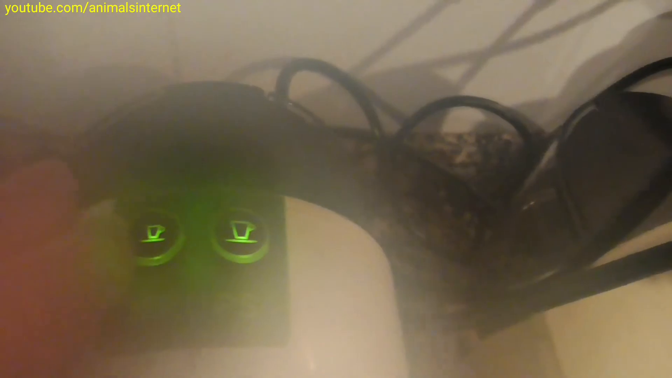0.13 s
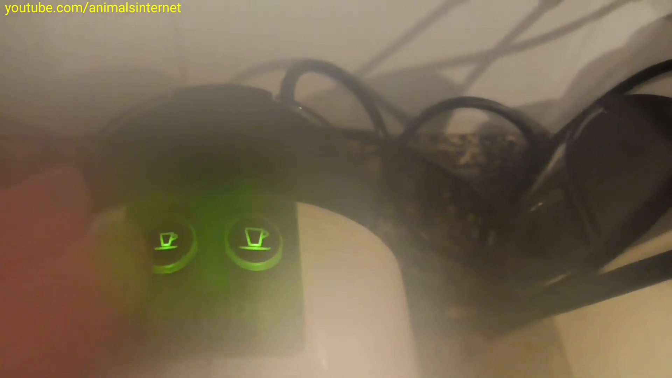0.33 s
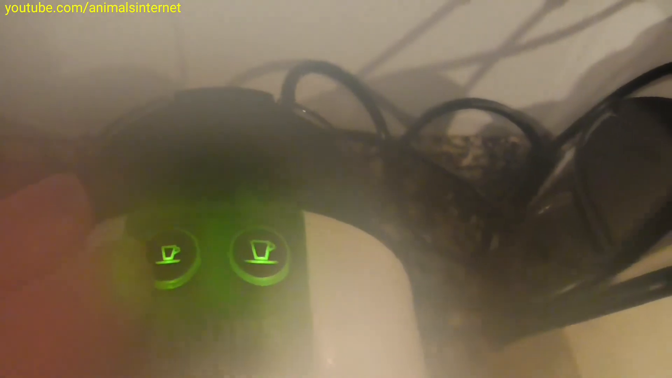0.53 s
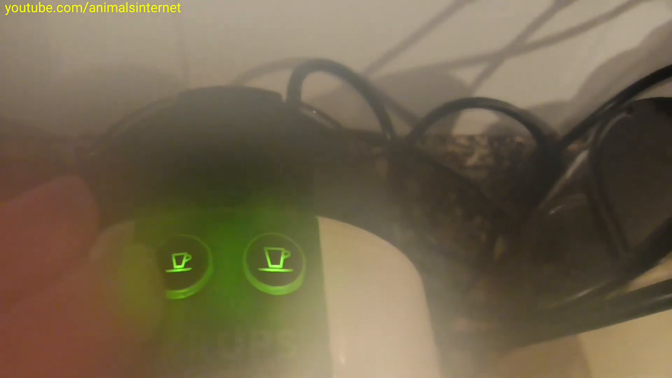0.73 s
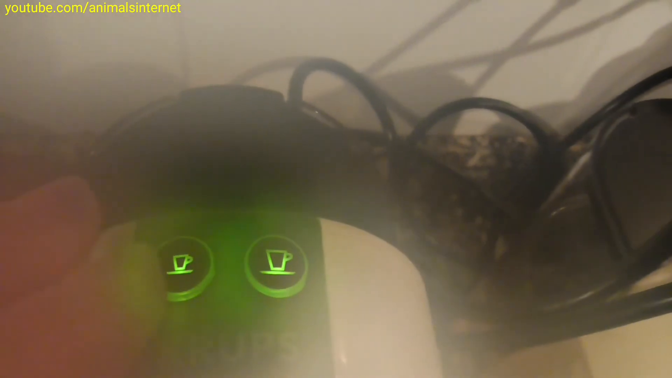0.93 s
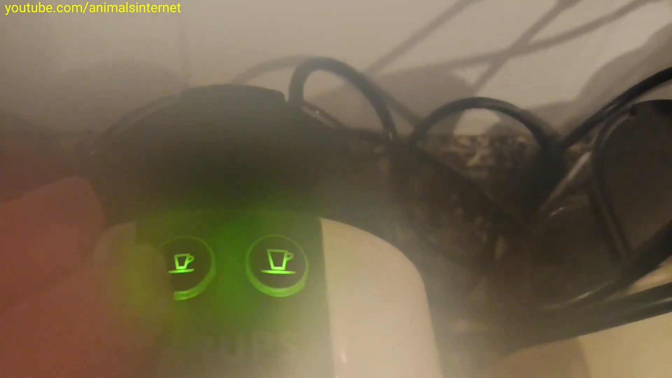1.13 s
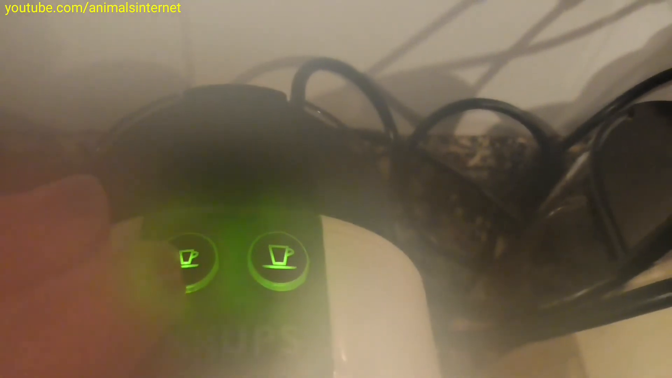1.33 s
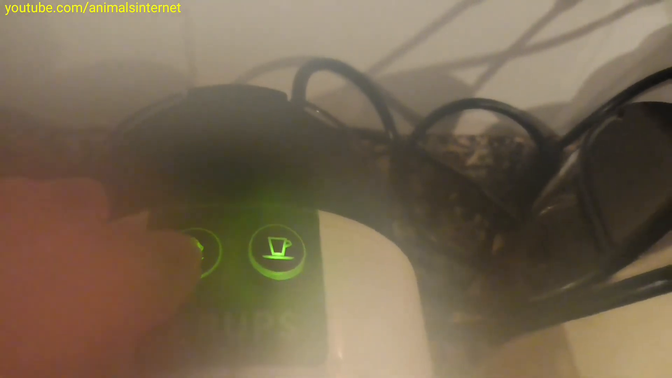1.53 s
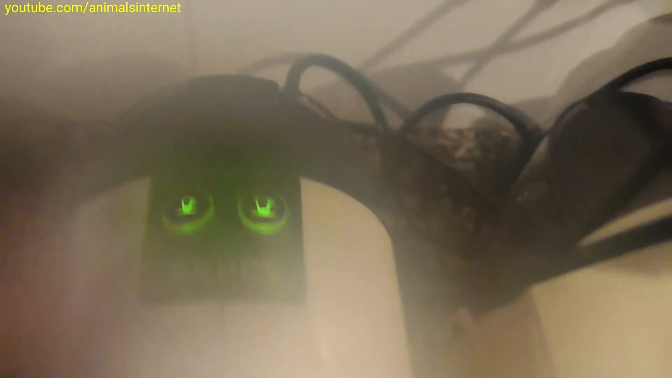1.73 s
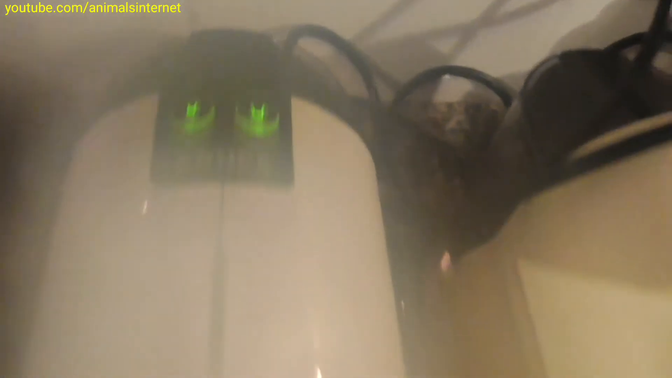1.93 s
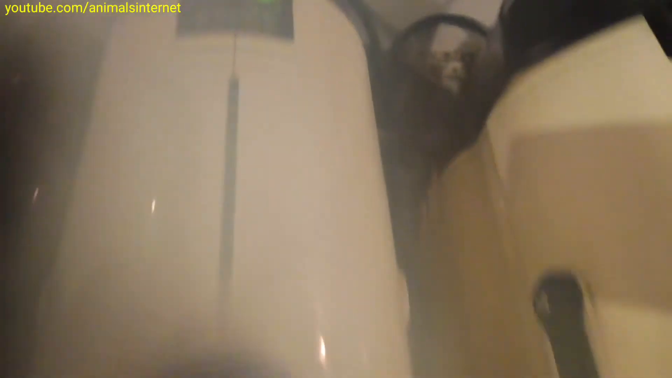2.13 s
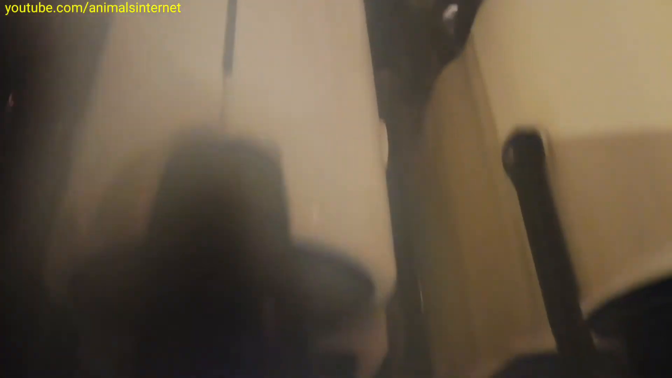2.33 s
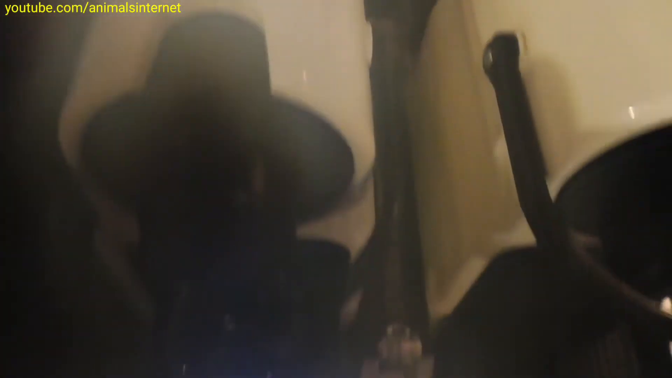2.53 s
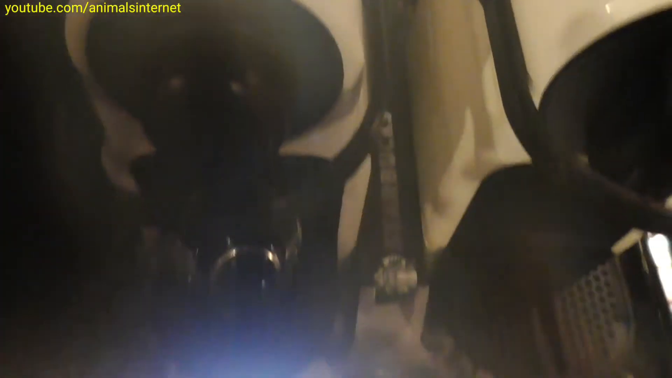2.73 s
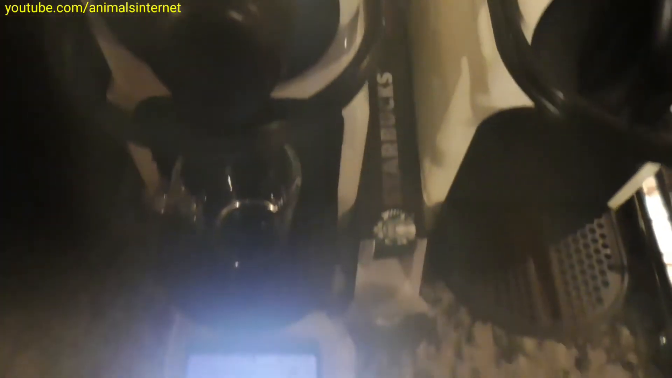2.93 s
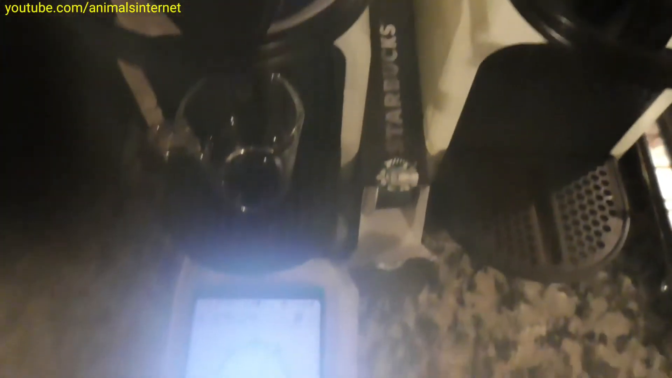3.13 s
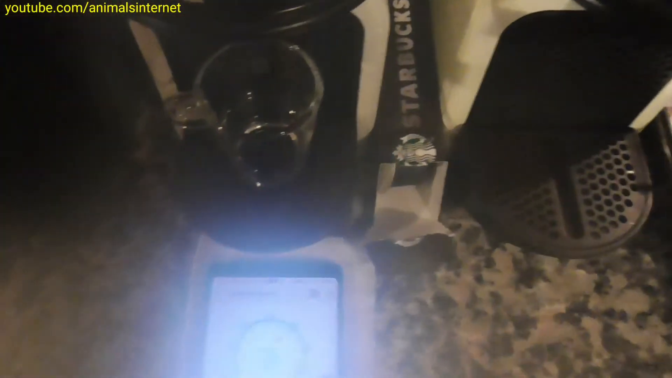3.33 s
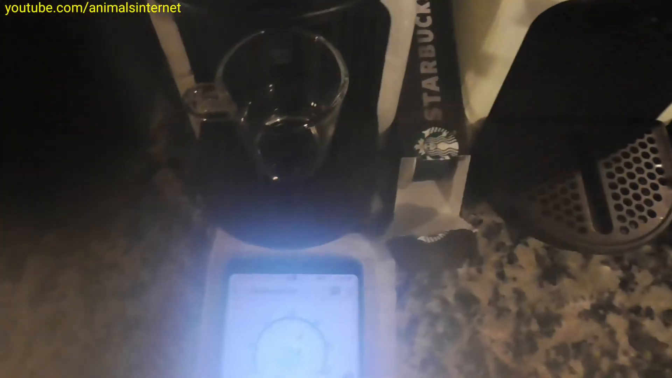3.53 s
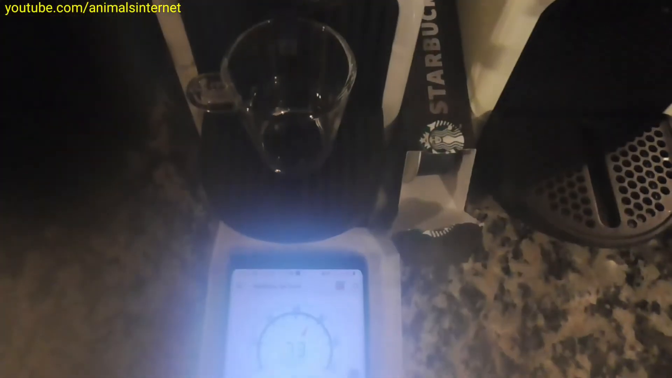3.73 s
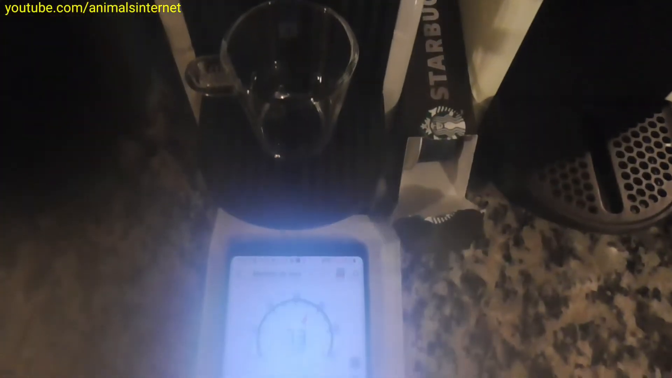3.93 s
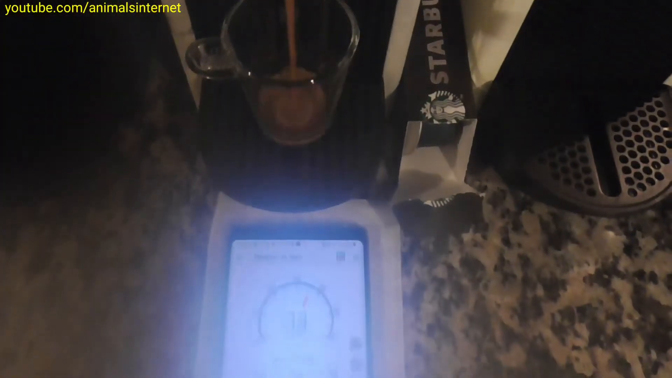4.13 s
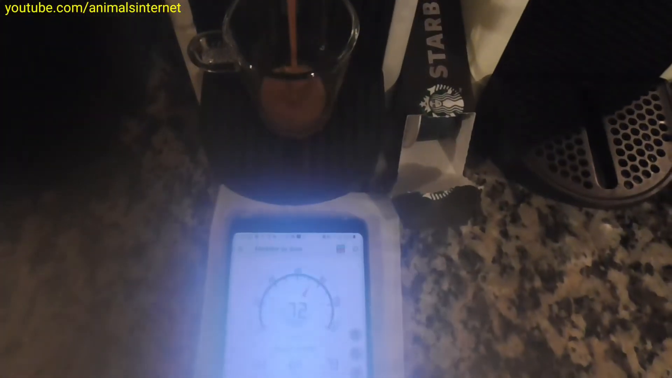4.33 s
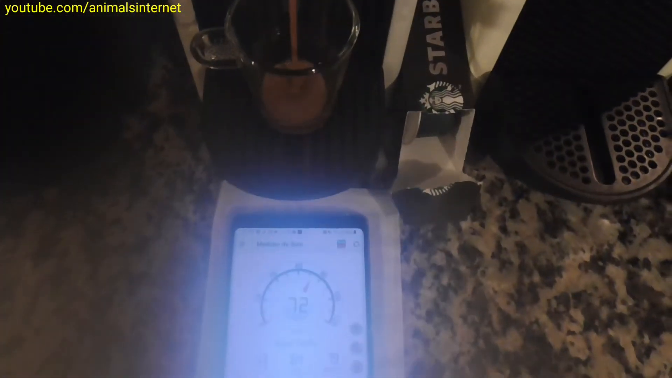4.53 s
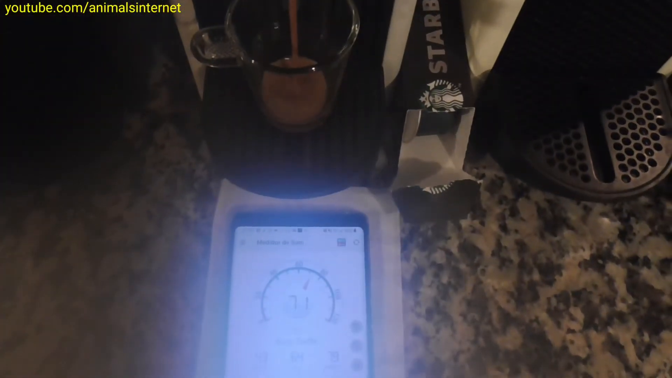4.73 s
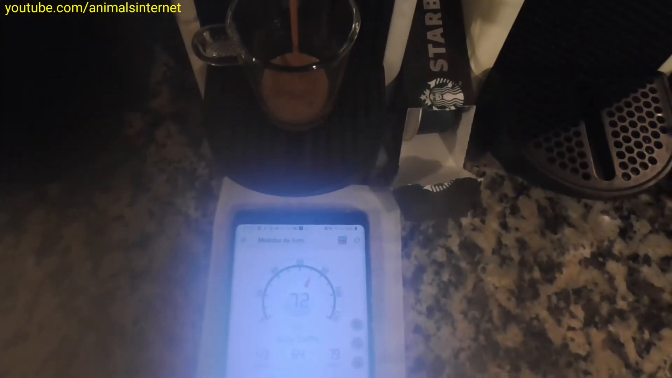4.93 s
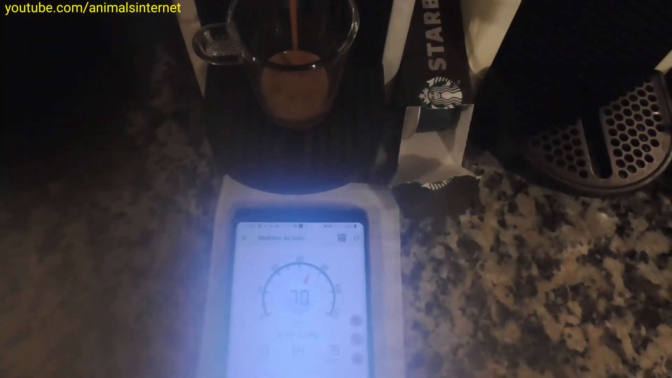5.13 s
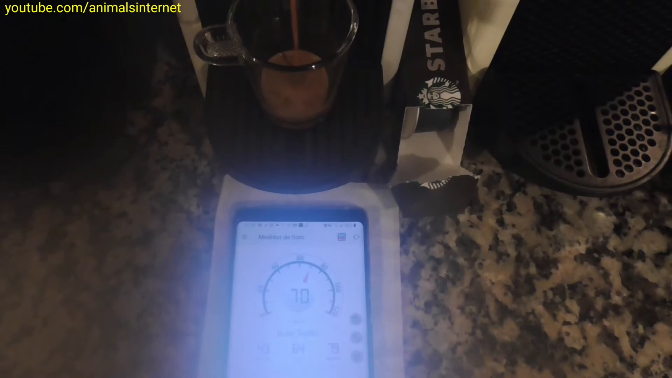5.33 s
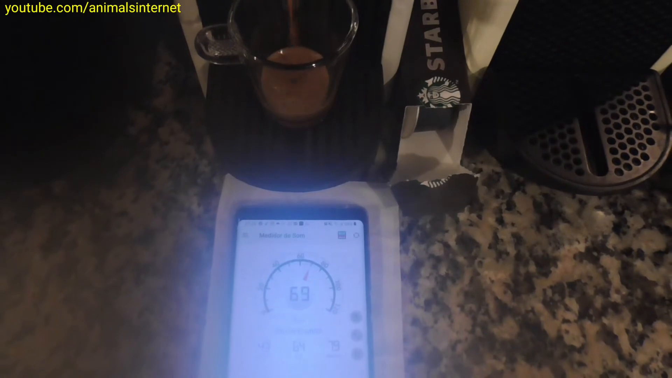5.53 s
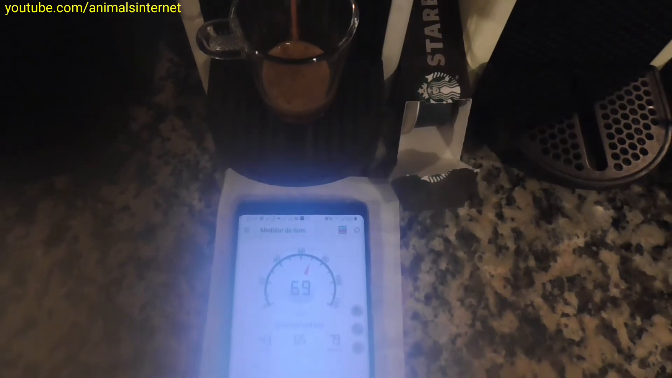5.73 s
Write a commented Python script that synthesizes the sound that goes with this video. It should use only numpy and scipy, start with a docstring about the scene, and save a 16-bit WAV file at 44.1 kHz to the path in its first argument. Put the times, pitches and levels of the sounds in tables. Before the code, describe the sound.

Handheld close microphone over a kitchen counter. Near silence with faint hum and small taps, then a button press sets off a vibrating pump at fifty strokes a second. At first it clatters loudly and hollowly on air with sputters, its tone climbing; the knocking fades into a tight, pressurised buzz with shrill hiss. A dry crack comes late, then the hiss eases while small drips ring in the glass cup.

```python
"""A kitchen hums quietly, faint ticks sound on plastic, and a fingertip brushes the button of a capsule coffee
machine. Its switch clicks, and its solenoid pump then strikes once per mains cycle: at first the piston knocks
on air, ringing a cavity whose pitch rises unevenly as it fills. As water arrives, the casing's harmonic buzz
takes over, with a squirt of noise on each stroke, rattling panels and a whistling valve. The capsule snaps once
under pressure (a decaying noise burst), the level dips, and coffee drips into a glass, each drip a bubble
ringing as a decaying, rising sine."""
import sys
import numpy as np
from scipy import signal
from scipy.fft import rfft, irfft
from scipy.io import wavfile
from scipy.ndimage import uniform_filter1d, map_coordinates

SR = 44100
rng = np.random.default_rng(int(sys.argv[2]) if len(sys.argv) > 2 else 0)


def wav_out(sig):
    """Save sig, one row per channel (or a flat mono array), as 16-bit PCM at SR to the path in sys.argv[1]."""
    wavfile.write(sys.argv[1], SR, np.round(np.clip(np.atleast_2d(sig).T, -1, 1) * 32767).astype(np.int16))


N = 259308

TIME = np.arange(N) / SR
FREQS = np.maximum(np.arange(N // 2 + 1) * SR / N, 1)
MAINS_HZ, START_S = 50.04, 1.613
STROKE_S = np.arange(0, N / SR + 1, 1 / MAINS_HZ)
CUTOFF_HZ = 15800

# stereo width: (frequency [Hz], side minus mid [dB])
WIDTH = [(60, -19), (110, -4.5), (200, -16), (380, -20), (700, -13.5), (1290, -11), (2380, -9),
         (4400, -7.5), (8120, -3), (15000, -0.5)]
# idle kitchen noise: (frequency [Hz], relative density [dB per Hz])
KITCHEN_SPECTRUM = [(50, -44), (100, -7.5), (242, -5.5), (398, -16.5), (540, -13.5), (700, -14.5),
                    (1270, -27.5), (1450, -19.5), (1780, -34.5), (3200, -34.5), (4200, -31), (5750, -42.5),
                    (8120, -33.5), (15500, -38.5)]
# partials of the appliance hum: (frequency [Hz], relative level [dB])
HUM_PARTIALS = [(59.2, -56), (118.4, -73.5), (242.2, -63), (538.3, -65.5), (1400, -90), (4060, -83.5),
                (4400, -94)]
# taps on the plastic case, the last one the click of the pump's switch: (time [s], relative level [dB], share
# of the hard colour [0-1])
TICKS = [(0.555, -49, .25), (0.574, -51, .2), (0.602, -50, .35), (0.687, -47, .75), (0.748, -50, .5),
         (0.778, -45, .45), (0.853, -48.5, .45), (0.924, -45.5, .4), (1.117, -40, .6), (1.608, -37, .35)]
# soft and hard colours of the taps: (frequency [Hz], relative density [dB per Hz])
SOFT_TICK_SPECTRUM = [(350, -10.5), (640, 10), (830, 5), (1000, 4.5), (1420, 5.5), (1650, 0), (2000, -28),
                      (3400, -21), (6000, -34), (15000, -42)]
HARD_TICK_SPECTRUM = [(400, -14), (900, 8.5), (1450, 8), (1900, -6), (2450, -9), (3350, -3.5), (4100, -10),
                      (6000, -21), (8500, -12), (15000, -30)]

# water pressure behind the capsule: (time [s], share of the highest [0-1])
PRESSURE = [(2.55, 0.21), (3.0, 0.51), (3.13, 0.82), (3.35, 0.76), (3.5, 1), (4.0, 0.93), (4.75, 0.9),
            (4.9, 0.83), (5.87, 0.83)]
# how late the piston lands in each mains cycle: (time [s], lag [s])
PISTON_LAG = [(1.62, 0.00043), (1.85, 0.0019), (2.0, 0.0044), (2.3, 0.00442), (2.6, 0.00322),
              (2.95, 0.00091), (4.2, 0.001023), (4.9, 0.0044), (5.87, 0.0043)]
WATER_ARRIVES_S, WATER_ARRIVES_OVER_S = 2.007, 0.013  # until then the piston runs dry
PRIMED_S, PRIMING_OVER_S, AIR_GONE_S = 2.292, 0.14, 3.22  # half the air is out; how gradually; knocking ends
POURS_S, POURS_OVER_S = 5.02, 0.066  # the coffee begins to run freely

# casing buzz: (multiple of the mains, then relative level [dB] dry, filling, pressing, soaking, pouring)
CASING = [(1, -12, -26, -22, -30, -23), (2, -16, -36, -16, -19.5, -20), (3, -2.5, -6, -8.5, -12, -11.5),
          (4, 6.5, -3.5, -14.5, -2.5, 2), (5, -3, 1, 7, 3.5, 5.5), (6, 5, 1, 9, 0.5, 4.5),
          (7, 1, -6, 6, -2.5, 0.5), (8, -7, 2.5, 5, 5, -0.5), (9.15, 7, -1.5, 8, 0, 4.5),
          (10, 1.5, 3.5, 9, 1.5, -3), (11.1, -17, -4, -0.5, -2.5, -5.5), (12.2, 5, 2.5, 4.5, 1, -19),
          (13, 0, -6, -20, -11, -5.5), (14.1, -2, -4, -12, -13, -21), (15, 5, 1, -11, -6, -6.5),
          (16, -18, 0, 6, 0.5, -4), (17, 5, -5.5, 4.5, -12, -12), (18, 8, -3.5, 6.5, -5.5, -7),
          (19, -3, -7, 3.5, -1.5, -12), (20, 9.5, 2, -4.5, -5, -20), (21, -15, -8, -6, -5, -17),
          (22, -13, -4.5, -12, -17, -24)]
# those five stages: (start [s], blend [s], thump arrival [s], clack arrival [s], phase scatter [rad])
STAGES = [(0, 1, .0061, .0043, 1), (1.96, 0.12, .0082, 0.00499, 1.23), (3.02, 0.54, .0091, 0.0072, 0.54),
          (4.052, .5, .0097, 0.00817, 1.57), (5.07, 0.095, .0026, 0.013, 0.85)]
# wavering of each harmonic: (frequency [Hz], share of its strength)
WAVER = [(250, .2), (500, .3), (900, .4)]
# the casing's clack: (time [s], level before air and pockets [dB])
CLACK = [(3.05, -35), (3.43, -32), (3.75, -27.5), (3.9, -28.5), (4.08, -26.5), (4.27, -28), (4.39, -31.5),
         (4.55, -28.5), (4.75, -29), (4.9, -27), (5.08, -30.5), (5.19, -33.5), (5.87, -36)]
THUMP_DB, THUMP_PRESSURE_DB = -49, 21  # unloaded; added at full pressure
THUMP_AIR_DB, THUMP_DRY_DB = 1, 7  # added when full of air; when dry
KICK_DB, KICK_T60_S = 8.5, 0.42  # the first strokes thump harder
CLACK_AIR_DB = 9.5  # added when full of air
AIR_WANDER_S, WAVER_S = .00022, .16  # timing spread at full air; memory of the wavering

# water churning in the hose: (frequency [Hz], relative density [dB per Hz])
CHURN_SPECTRUM = [(150, -22), (270, -12), (340, 2), (600, 0), (900, 0), (1150, -15), (2000, -33.5)]
CHURN_DB, CHURN_PRESSURE_DB = -52, 13  # unloaded; added at full pressure
SQUIRT_TOP_S, SQUIRT_PRESSURE_S, SQUIRT_DRY_S = 0.0031, 0.0022, 0.0017  # time scale; added by pressure; when dry
SQUIRT_ROUNDING, SQUIRT_EARLY_S = 1, 0.0018  # at full pressure the valve opens more gently, and sooner
LEAK, LEAK_DRY, LEAK_AIR = 0.24, 0.12, 0.35  # flow between squirts; added when dry; by air in the pump
LEAK_PRESSURE, LEAK_POURING = 0.15, 0.13  # added by pressure; once the coffee runs

# modes of the air cavity: (multiple of its pitch, relative level [dB])
CAVITY_MODES = [(.74, -8.5), (1, 6), (1.26, -9), (1.55, -12.5), (2.2, -19)]
# pitch of the air cavity as water comes in: (time [s], frequency [Hz])
CAVITY_PITCH = [(1.62, 737), (1.8, 796), (1.95, 835), (1.98, 915), (2.04, 835), (2.12, 904), (2.19, 964),
                (2.25, 980), (2.295, 1140), (2.35, 1034), (2.41, 1040), (2.45, 1140), (2.49, 1034),
                (2.56, 1220), (2.64, 1050), (2.74, 1050), (2.8, 1245), (2.87, 1170), (3.1, 1266)]
# the housing through which the knocks sound: (frequency [Hz], relative gain [dB])
HOUSING = [(200, -4.5), (360, 0.5), (490, -3), (620, 4.5), (700, -2.5), (810, 2.5), (930, -1.5),
           (1020, -0.5), (1130, 1), (1280, 4), (1420, 2), (2500, -11.5)]
# air pockets alter runs of knocks: (time [s], half length [s], added level [dB], added rebound strength)
AIR_POCKETS = [(1.704, 0.044, -3, .1), (1.841, 0.021, 0.5, -0.58), (1.89, 0.024, -0.5, -0.46),
               (1.937, 0.012, 2.5, 0.38), (2.028, 0.018, -2, -0.38), (2.1, 0.05, 1.5, 0.16),
               (2.225, 0.021, 0.5, 0.2), (2.298, 0.023, 4, -0.12), (2.36, 0.058, 4.5, -.2),
               (2.475, 0.059, 4.5, 0.32), (2.552, 0.041, 10.5, -.3), (2.803, 0.023, 5.5, -0.3),
               (3.007, 0.026, 4.5, 0.17), (3.127, 0.034, 3.5, 0.032)]
KNOCK_DB, KNOCK_AIR_DB = -36.5, 18  # when primed; added when full of air
KNOCK_PITCH_SPREAD = .022  # share of the pitch
REBOUND, REBOUND_DRY = 0.35, 0.59  # strength of the piston's rebound; added when dry
SCATTER_S, SCATTER_DRY_S = .00006, .00009  # timing scatter of the piston; added when dry

# loose panels: (frequency [Hz], relative density [dB per Hz])
PANELS = [(850, -52.5), (1080, 7), (1180, 2.5), (1270, 15.5), (1370, 4), (1500, 7), (1670, 1.5), (1870, 6),
          (2020, 2), (2400, 1), (2800, -9), (3400, -8.5), (4000, -6.5), (5500, -6.5), (8000, -30.5)]
RATTLE_DB, RATTLE_PRESSURE_DB = -7, 2.5  # against the hiss; added at full pressure
RATTLE_DRY_DB, RATTLE_RELIEF_DB = -3.5, -0.5  # added when dry; once the capsule has snapped
RATTLE_SHIFTS_S = .12  # memory of the pattern
GRAINS_PER_S, GRAIN_SPREAD_DB = 640, 4.5  # stray contacts of the loose panels

# water squeezing through the valve: (frequency [Hz], relative density [dB per Hz])
JET_SPECTRUM = [(200, -8.5), (400, 2.5), (1000, 5.5), (1800, -4), (2800, 1), (5200, -3.5), (6200, -6),
                (7500, -3), (10500, -6), (12500, -12.5), (15000, -24.5), (16000, -47)]
# resonances that the water excites: (frequency [Hz], width [Hz], added level [dB])
VALVE_RESONANCES = [(2780, 320, -20), (3950, 300, 10), (5080, 400, 4), (6130, 460, -16.5), (7700, 220, 6),
                    (8450, 500, 6), (9830, 420, 3)]
# treble reference level until the grounds soak through: (time [s], level [dB])
HISS = [(1.62, -33.5), (2.25, -32.5), (2.75, -35.5), (3.0, -40.5), (3.22, -34.5), (3.7, -30.5), (4.2, -34)]
EASING_S, HISS_SAG_DB_PER_S = 4.87, 6.5  # from then on the hiss dies down
# the valve spits: (time [s], half length [s], added hiss [dB], added rattle [dB])
SPITS = [(1.974, 0.023, 4, 11), (2.218, 0.054, 3, 6), (2.495, 0.042, 3.5, -1), (2.631, 0.08, -0.5, 7),
         (3.116, 0.074, -.5, 5), (3.52, 0.065, 3, 4), (4.21, 0.17, 3.5, 5), (5.5, 0.045, 1, 4.5)]
JET_FLICKER_DB, JET_RIPPLE_DB = 2.5, 1.6  # spread over time; spread along frequency

# loose parts ringing along, and (rows from 2.89 to 3.27 s) rough spells of the valve's whistle: (time [s], half
# length [s], frequency [Hz], swell time scale [s], level [dB])
CHATTERS = [(1.945, 0.039, 1450, 0.011, -30.5), (1.975, 0.022, 4980, 0.0011, -36),
            (2.245, 0.07, 2310, 0.0056, -39.5), (2.268, 0.071, 623, 0.01, -35),
            (2.397, 0.038, 1770, 0.0022, -43), (2.606, 0.033, 1740, 0.0065, -46),
            (2.639, 0.08, 2050, .003, -50), (2.89, 0.3, 3606, 0.002, -42), (3.04, 0.12, 3840, .002, -43.5),
            (3.27, 0.12, 4090, 0.002, -46), (3.587, 0.07, 1620, 0.0023, -36),
            (3.98, 0.17, 1834, 0.003, -43.5), (4.22, 0.1, 1830, 0.0021, -44),
            (4.51, 0.3, 1820, 0.0016, -42), (4.953, 0.15, 1267, 0.013, -39.5),
            (5.427, 0.16, 1897, 0.01, -43), (5.803, .12, 1940, 0.016, -48)]
# notes of the valve: (frequency [Hz], relative level [dB], swell time scale [s], unsteadiness [rad])
WHISTLE_NOTES = [(3490, 3, 0.0058, 0.92), (4060, -9, 0.0067, 1.3)]
# spells of whistling: (time of full level [s], length held [s], level [dB])
WHISTLE_SPELLS = [(3.54, 0.07, -33.5), (3.79, 0.2, -31.5), (4.056, 0.17, -36), (4.234, 0.24, -34.5),
                  (4.58, 0.18, -43.5)]
WHISTLE_ATTACK_S, WHISTLE_RELEASE_S, WHISTLE_REST_DB = 0.089, 0.082, -49.5

SNAP_S, SNAP_T60_S = 4.7615, .019
# crack of the capsule: (frequency [Hz], relative density [dB per Hz])
SNAP_SPECTRUM = [(120, -26), (350, 2), (800, -1), (1600, -12), (2500, -12), (4200, -5), (5100, -4),
                 (5900, -21), (6500, 2), (7300, 6), (9500, -5.5), (12000, -15), (16000, -20)]
# drips into the glass: (time [s], relative level [dB], bubble frequency [Hz])
DRIPS = [(5.323, -35, 1460), (5.3507, -36, 1800), (5.4665, -38, 1470), (5.52, -34, 1530),
         (5.7359, -47, 1530)]


def from_db(db):
    """Gain is the decibel value on a logarithmic scale of base ten."""
    return 10 ** (np.asarray(db) / 20)


def rms_one(x):
    """Normalize the mean power to 1."""
    return x / np.sqrt(np.mean(x ** 2) + 1e-20)


def in_time(rows):
    """Linear interpolation gives each column of a curve at every sample."""
    s, *columns = np.transpose(rows)
    return [np.interp(TIME, s, c) for c in columns]


def at_hz(points, hz=FREQS):
    """Interpolate a spectrum on a logarithmic frequency axis."""
    corner_hz, value = np.array(points).T
    return np.interp(np.log(hz), np.log(corner_hz), value)


def resonance(hz, width_hz):
    """Magnitude response of one damped resonance, 1 on top."""
    return 1 / np.hypot(1, 2 * (FREQS - hz) / width_hz)


def through(x, gain):
    """A minimum-phase body is causal: it rings after each blow, never before it."""
    cepstrum = irfft(np.log(gain + 1e-5), N)
    # folding the cepstrum onto positive times makes the response causal
    folded = cepstrum[:N // 2] * np.minimum(np.arange(N // 2) + 1, 2)
    return irfft(rfft(x) * np.exp(rfft(folded, N)), N)


def colour(pair, gain):
    """Mid-side coding of two unrelated signals in one body: alike in the bass, wide in the treble; rms 1."""
    mid, side = through(pair, gain)
    side = irfft(rfft(side) * from_db(at_hz(WIDTH)), N)
    return rms_one(np.array([mid + side, mid - side]))


def noise(gain):
    """White noise filtered to a given colour, in stereo."""
    return colour(rng.standard_normal((2, N)), gain)


def drift(per_s):
    """Slow random modulation by interpolated chance values, rms 1."""
    return rms_one(np.interp(TIME * per_s, np.arange(4000), rng.standard_normal(4000)))


def turn(at_s, over_s):
    """A logistic transition from 0 to 1."""
    return .5 + .5 * np.tanh((TIME - at_s) / over_s / 2)


def bump(at_s, half_s):
    """A Gaussian swell to 1 and back."""
    return np.exp(-((TIME - at_s) / half_s) ** 2)


def dying(t60, since=TIME):
    """Exponential decay from time zero, losing 60 dB in t60 seconds."""
    return (since >= 0) * from_db(-60 * np.abs(since) / t60)


def evened(x, size=3):
    """Divide by a running rms over a few strokes, so that short-term power stays near 1."""
    power = np.mean(np.atleast_2d(x) ** 2, axis=0)
    running = uniform_filter1d(power, int(size * SR / MAINS_HZ))
    return x / np.sqrt(np.abs(running) + 1e-4 * power.mean())


def every_stroke(cycles, wander_s=0):
    """Phase-locked playback of successive cycles at the mains rate, a little early or late."""
    phase = (TIME - START_S - wander_s) * MAINS_HZ % 1
    return map_coordinates(cycles, [TIME * MAINS_HZ, phase * cycles.shape[1]], order=1, mode="grid-wrap")


def kindred(size, memory_s):
    """A first-order autoregression: each stroke's chance values resemble the last; spread 1."""
    keep = np.exp(-1 / (memory_s * MAINS_HZ))
    chance = rng.standard_normal((len(STROKE_S), size))
    return signal.lfilter([np.sqrt(1 - keep ** 2)], [1, -keep], chance, axis=0)


def small_modes(spacing_hz):
    """Many small resonances leave an uneven ripple along frequency, rms 1."""
    return rms_one(np.interp(FREQS / spacing_hz, np.arange(1000), rng.standard_normal(1000)))


def stroke_tone(hz, since_s, top_s, unsteady, spread):
    """Repeated excitation: each stroke rings a resonance afresh, its phase wobbling and offset in stereo; rms 1."""
    age = since_s % (1 / MAINS_HZ)
    wobble, sway, strength_db = (
        np.interp((since_s + START_S) * per_s, np.arange(1000), rng.standard_normal(1000))
        for per_s in (110, 14, 60))
    swell = age / top_s * np.exp(-(age / top_s) ** 1.5) * from_db(strength_db)
    stereo_rad = spread * np.array([[.5], [-.5]])
    return rms_one(swell * np.sin(2 * np.pi * hz * age + unsteady * wobble + sway + stereo_rad))


def room(x, t60, wet_db):
    """Diffuse reverberation: counter and walls answer with a short tail, different on each side."""
    size = SR // 2
    tail = rng.standard_normal((2, size)) * dying(t60, TIME[:size] - .003)
    tail /= np.sqrt(np.sum(tail ** 2, axis=1, keepdims=True))
    return x + from_db(wet_db) * signal.fftconvolve(np.atleast_2d(x), tail, axes=1)[:, :N]


def kitchen(air_db, hum_db):
    """Background as filtered noise plus an appliance's hum partials; both sink early in the pumping, then return."""
    hum = sum(from_db(db) * np.sqrt(2) * np.sin(2 * np.pi * (hz * TIME + rng.random()))
              for hz, db in HUM_PARTIALS)
    air = noise(from_db(at_hz(KITCHEN_SPECTRUM)))
    sink_db = np.interp(TIME, [1.62, 2.0, 2.8, 3.5], [0.5, -19, -13, 1])
    return from_db(sink_db) * (from_db(air_db) * air + from_db(hum_db) * hum)


def ticks(level_db, t60):
    """Impact on plastic: decaying noise bursts, their colour a mix of dull and hard."""
    soft, hard = noise(from_db(at_hz(SOFT_TICK_SPECTRUM))), noise(from_db(at_hz(HARD_TICK_SPECTRUM)))
    taps = sum(from_db(db) * dying(t60, TIME - s) * ((1 - share) * soft + share * hard)
               for s, db, share in TICKS)
    return from_db(level_db) * taps


def finger(level_db):
    """Friction of a fingertip on the button: a swell of broadband noise."""
    return from_db(level_db) * noise(resonance(hz=1500, width_hz=12000)) * bump(at_s=1.49, half_s=.021)


def casing_cycles():
    """Fourier synthesis of strokes: arrival delays set the phases, stages blend, harmonics waver independently."""
    multiple, *stage_db = np.transpose(CASING)
    hz, size = multiple * MAINS_HZ, len(CASING)
    begun = [np.interp(STROKE_S, [s, s + blend_s], [0, 1]) for s, blend_s, *timing in STAGES]
    shares = -np.diff(begun, axis=0, append=0).T
    phases = []
    for s, blend_s, *arrivals, scatter in STAGES:
        # summing the delay along the harmonics gives the phase
        delay_s = np.interp(hz, [200, 750], arrivals)
        phases.append(-2 * np.pi * MAINS_HZ * np.cumsum(delay_s) + scatter * rng.standard_normal(size))
    blended_phase = np.angle(shares @ np.exp(1j * np.array(phases)))
    lines = shares @ from_db(stage_db) * np.exp(1j * blended_phase)
    chance = (kindred(size, WAVER_S) + 1j * kindred(size, WAVER_S)) / np.sqrt(2)
    lines = lines * (1 + at_hz(WAVER, hz) * chance)
    return irfft(np.pad(lines, [(0, 0), (1, 0)]), 1024)


def buzz(thump_db, air, pocket_db):
    """Periodic forcing of the casing gives a low thump and higher clack; air makes timing and level uneven."""
    wander_s = AIR_WANDER_S * np.sqrt(air) * drift(90)
    pair = np.array([every_stroke(casing_cycles(), wander_s) for channel in range(2)])
    low = 1 / (1 + (FREQS / 450) ** 16)  # power share of the thump
    thump_db = thump_db + (0.8 + 0.9 * air) * drift(60)
    clack_db = in_time(CLACK)[0] + CLACK_AIR_DB * air + 0.17 * pocket_db
    clack_db = clack_db + (0.5 + 1.0 * air) * drift(150)
    thump = evened(colour(pair, np.sqrt(low))) * from_db(thump_db)
    clack = evened(colour(pair, np.sqrt(1 - low))) * from_db(clack_db)
    return thump + clack


def squirt(lag_s, top_s, leak, pressure):
    """Pulsed flow: once a stroke it jumps up, then dies away to a leak; pressure rounds the jump."""
    since_s = TIME - START_S - lag_s + SQUIRT_EARLY_S * pressure
    age = since_s % (1 / MAINS_HZ) / np.maximum(top_s, 5e-4)
    pulse = np.sqrt(age ** (1 + SQUIRT_ROUNDING * pressure) * np.exp(1 - age ** 1.5))
    return np.hypot(pulse, leak)


def churn(flow, pressure):
    """Turbulence in the hose: flow-modulated noise, given a boost around the first pressure peak."""
    level_db = CHURN_DB + CHURN_PRESSURE_DB * pressure + 5 * bump(at_s=3.55, half_s=0.15)
    return from_db(level_db) * evened(noise(from_db(at_hz(CHURN_SPECTRUM))) * flow)


def knocks(level_db, pocket_rebound, dry, lag_s, swell_s, pitch_spread):
    """Impact and cavity resonance: the piston hits, rebounds and falls back, each contact ringing the air cavity."""
    cavity_hz, = in_time(CAVITY_PITCH)
    rebound = np.maximum(REBOUND + REBOUND_DRY * dry + pocket_rebound, 0)
    scatter_s = SCATTER_S + SCATTER_DRY_S * dry
    out, age = np.zeros(N), TIME[:SR // 30]
    swell = (age / swell_s) ** 1.5 * np.exp(-age / swell_s)
    for s in np.arange(START_S, 3.45, 1 / MAINS_HZ):
        i = int(s * SR)
        contacts = [(0, 0.78), (.0047, rebound[i]), (.0125, 0.043 + 0.3 * rebound[i])]
        for delay_s, strength in contacts:
            early, hard, sharp = rng.standard_normal(3)
            at = int((s + lag_s[i] + delay_s + early * scatter_s[i]) * SR)
            hz = cavity_hz[i] * (1 + pitch_spread * sharp)
            ring = sum(from_db(db) * np.sin(2 * np.pi * multiple * hz * age) for multiple, db in CAVITY_MODES)
            out[at:at + len(age)] += strength * from_db(1.6 * hard) * swell * ring
    heard = room(through(out, from_db(at_hz(HOUSING))), t60=0.3, wet_db=-10.0)
    return evened(heard) * from_db(level_db) * (1 - turn(AIR_GONE_S, over_s=0.027))


def rattle(flow, loose):
    """Intermittent contact: panels chatter in a slowly shifting pattern, with random stray contacts."""
    size = int(SR / MAINS_HZ)
    pair = np.array([every_stroke(kindred(size, RATTLE_SHIFTS_S)) for channel in range(2)])
    sizes = from_db(GRAIN_SPREAD_DB * np.minimum(rng.exponential(1, N), 4))
    struck = rng.random(N) < GRAINS_PER_S / SR
    stray = rms_one(sizes * struck * rng.standard_normal((2, N)))
    return evened(colour((pair + loose * stray) * flow, from_db(at_hz(PANELS))))


def jet(flow, air, pressure, pouring, ripple_db):
    """Jet noise in the valve: broad as it spits air, then shrill, ringing in metal with water, finer as it pours."""
    fine_db = ripple_db * small_modes(spacing_hz=70.1)
    plain_db = at_hz(JET_SPECTRUM) + fine_db
    peaks_db = sum(db * resonance(hz, width_hz) ** 2 for hz, width_hz, db in VALVE_RESONANCES)
    spitting_db = at_hz(JET_SPECTRUM) - 1.8 * resonance(hz=3380, width_hz=1300) + 0.48 * fine_db
    spitting = noise(from_db(spitting_db))
    ringing = noise(from_db(plain_db + peaks_db)) * from_db(JET_FLICKER_DB * drift(50))
    fine = noise(from_db(plain_db + 0.79 * peaks_db - 8.4 * resonance(hz=4550, width_hz=1100) ** 2))
    shrill = noise(resonance(hz=9960, width_hz=200) ** 2)
    straining = from_db(-8.5) * bump(at_s=3.37, half_s=0.46) * shrill
    water = .8 * np.clip(pressure * (1 - air), 0, 1) ** 2
    pressed = np.sqrt(1 - water) * spitting + np.sqrt(water) * ringing + straining
    return evened((np.sqrt(1 - pouring) * pressed + np.sqrt(pouring) * fine) * flow)


def chatter(lag_s):
    """Sympathetic resonance: loose parts ring along for a few strokes, each at its own pitch; around 3 s the
    valve also whistles roughly in the same way."""
    out, since_s = np.zeros((2, N)), TIME - START_S - lag_s
    for s, half_s, hz, top_s, db in CHATTERS:
        near = np.flatnonzero(np.abs(TIME - s) < 3 * half_s)
        swell = from_db(db) * np.exp(-((TIME[near] - s) / half_s) ** 2)
        out[:, near] += swell * stroke_tone(hz, since_s[near], top_s, unsteady=0.81, spread=0.27)
    return out


def whistle(lag_s):
    """Flow-excited resonance: the valve sings two notes on each squirt, in spells; its seat damps it in between."""
    song = sum(from_db(db) * stroke_tone(hz, TIME - START_S - lag_s, top_s, unsteady, spread=0.19)
               for hz, db, top_s, unsteady in WHISTLE_NOTES)
    spells = []
    for s, length, db in WHISTLE_SPELLS:
        corners_s = [s - WHISTLE_ATTACK_S, s, s + length, s + length + WHISTLE_RELEASE_S]
        spells.append(from_db(db) * np.interp(TIME, corners_s, [0, 1, 1, 0]))
    rest = from_db(WHISTLE_REST_DB) * (turn(at_s=2.3, over_s=0.046) - turn(at_s=5.55, over_s=0.017))
    return rms_one(song) * np.maximum(np.max(spells, axis=0), rest)


def snap(level_db, t60):
    """Sudden release of stress: the capsule gives way with one bright, decaying noise burst."""
    crack = from_db(level_db) * noise(from_db(at_hz(SNAP_SPECTRUM))) * dying(t60, TIME - SNAP_S)
    return room(crack, t60=0.11, wet_db=-14)


def drips(level_db, t60, rise_per_s):
    """Bubble resonance: each drip traps a bubble that rings briefly, rising in pitch."""
    out = np.zeros(N)
    for s, db, hz in DRIPS:
        age = TIME - s
        cycles = hz * age * (1 + rise_per_s * age / 2)
        out += from_db(db) * dying(t60, age) * np.sin(2 * np.pi * cycles)
    return from_db(level_db) * out


def scene():
    """Superposition: air and pressure steer the pump's layers; small events and the kitchen lie around them."""
    (pressure,), (lag_s,), (hiss_db,) = in_time(PRESSURE), in_time(PISTON_LAG), in_time(HISS)
    dry = 1 - turn(WATER_ARRIVES_S, WATER_ARRIVES_OVER_S)
    air = 1 - turn(PRIMED_S, PRIMING_OVER_S)
    pouring = turn(POURS_S, POURS_OVER_S)
    kick_db = KICK_DB * dying(KICK_T60_S, TIME - START_S)
    pocket_db, pocket_rebound = sum(np.outer(added, bump(s, half)) for s, half, *added in AIR_POCKETS)
    spit_hiss_db, spit_rattle_db = sum(np.outer(added, bump(s, half)) for s, half, *added in SPITS)

    hiss_db = hiss_db - HISS_SAG_DB_PER_S * np.maximum(TIME - EASING_S, 0)
    rattle_db = hiss_db + RATTLE_DB + RATTLE_PRESSURE_DB * pressure + RATTLE_DRY_DB * dry
    rattle_db = rattle_db + RATTLE_RELIEF_DB * (TIME > SNAP_S) + spit_rattle_db
    jet_db = hiss_db + spit_hiss_db - 1.0
    thump_db = THUMP_DB + THUMP_PRESSURE_DB * pressure + THUMP_AIR_DB * air + THUMP_DRY_DB * dry + kick_db
    knock_db = KNOCK_DB + KNOCK_AIR_DB * air + pocket_db

    leak = LEAK + LEAK_DRY * dry + LEAK_AIR * air ** 3 + LEAK_PRESSURE * pressure + LEAK_POURING * pouring
    squirt_top_s = SQUIRT_TOP_S + SQUIRT_PRESSURE_S * pressure + SQUIRT_DRY_S * dry
    flow = squirt(lag_s, squirt_top_s, leak, pressure)
    flow = flow * from_db(.7 * drift(50) + 1.0 * drift(500))

    pump = buzz(thump_db, air, pocket_db) + churn(flow, pressure)
    knocking = knocks(knock_db, pocket_rebound, dry, lag_s, swell_s=0.0011, pitch_spread=KNOCK_PITCH_SPREAD)
    pump += from_db([[.6], [-.6]]) * knocking  # a little to the left
    pump += from_db(rattle_db) * rattle(flow, loose=0.35)
    pump += from_db(jet_db) * jet(flow, air, pressure, pouring, ripple_db=JET_RIPPLE_DB)
    pump += chatter(lag_s) + whistle(lag_s)
    pump *= np.clip((TIME - START_S) / 0.0012, 0, 1)
    # the pump's level dips briefly after the snap
    pump *= from_db(-8 * dying(0.31, TIME - SNAP_S) * turn(SNAP_S + 0.0042, over_s=.0015))

    before = kitchen(air_db=-58, hum_db=-1.0) + ticks(level_db=-2.5, t60=0.05) + finger(level_db=-62.5)
    late = snap(level_db=-13.5, t60=SNAP_T60_S) + drips(level_db=4.5, t60=0.045, rise_per_s=4)
    return before + pump + late


def record(dry):
    """Elliptic low-pass filtering cuts the top steeply."""
    return signal.sosfilt(signal.ellip(10, .1, 90, CUTOFF_HZ, fs=SR, output="sos"), dry)


dry = scene()
out = record(dry)
wav_out(out)
```